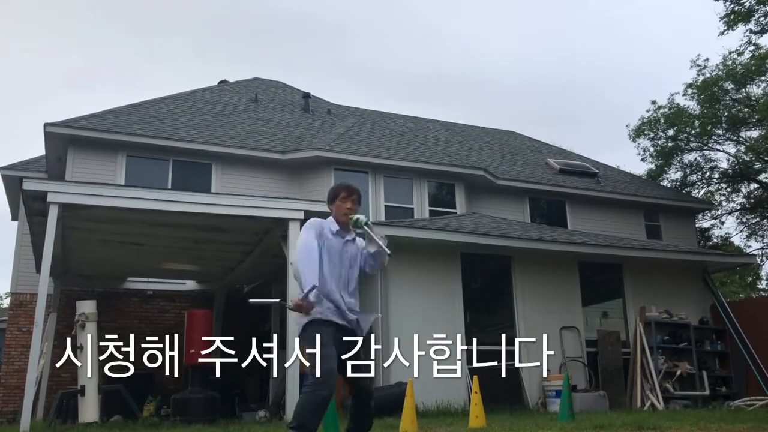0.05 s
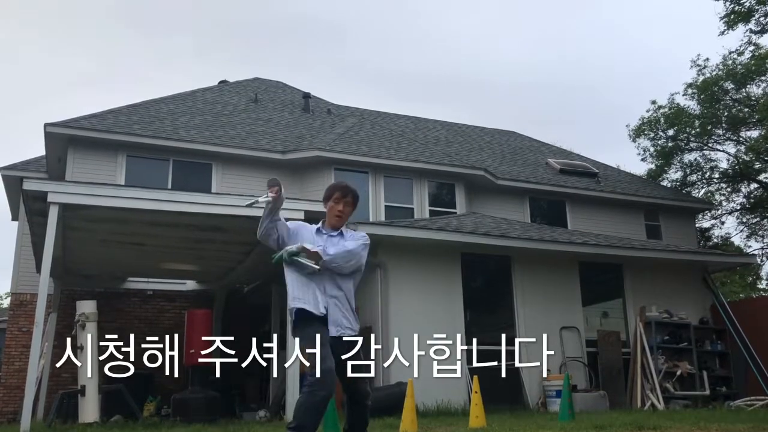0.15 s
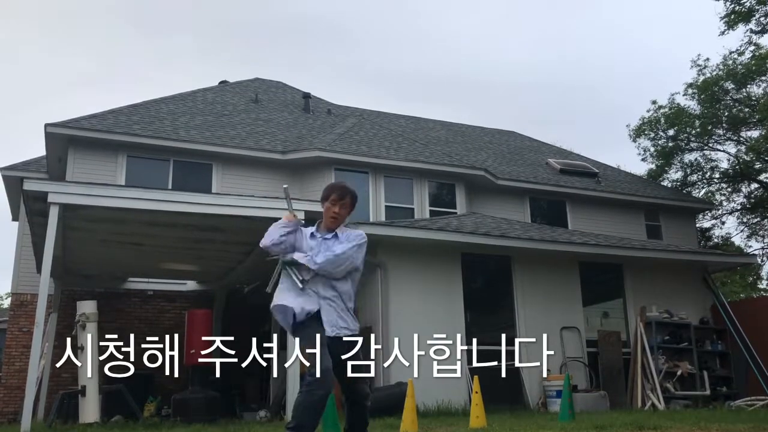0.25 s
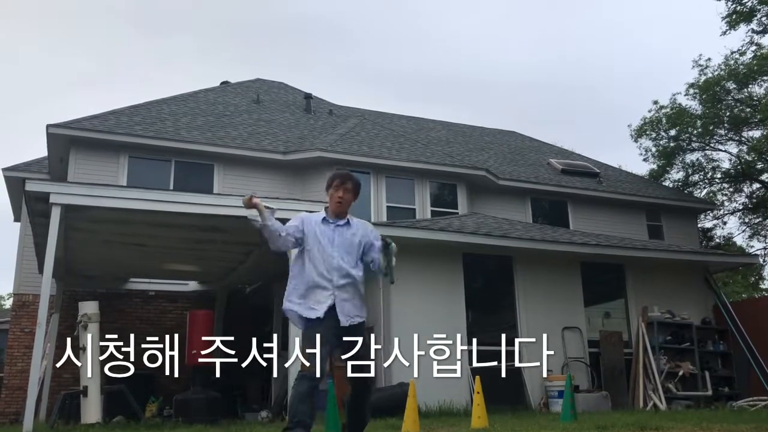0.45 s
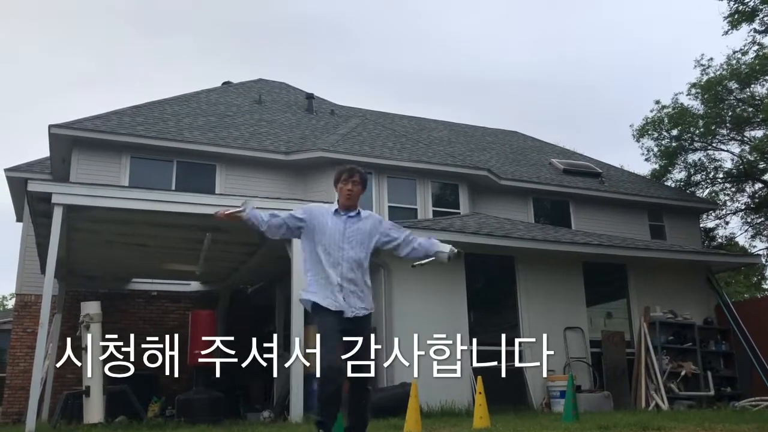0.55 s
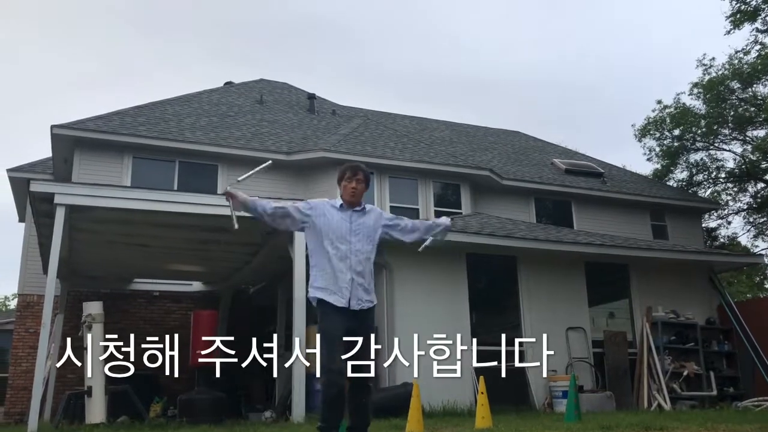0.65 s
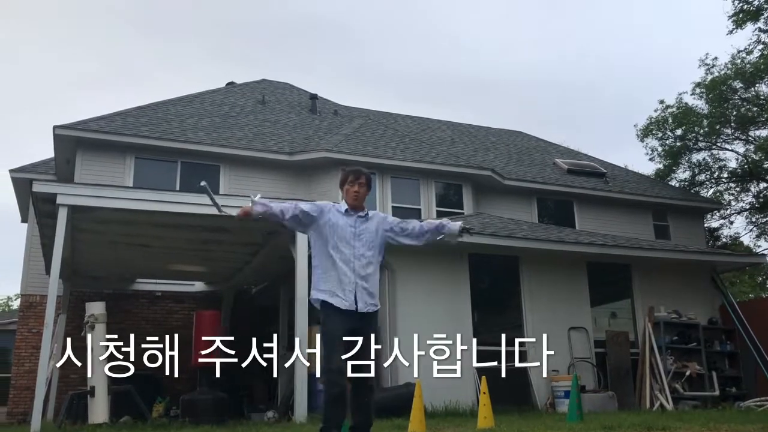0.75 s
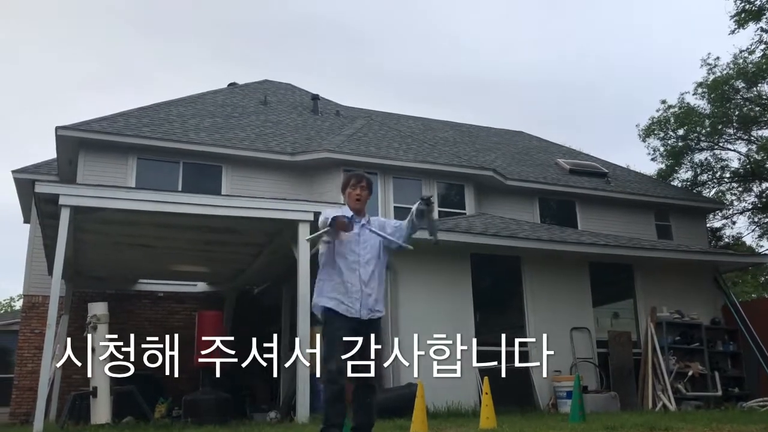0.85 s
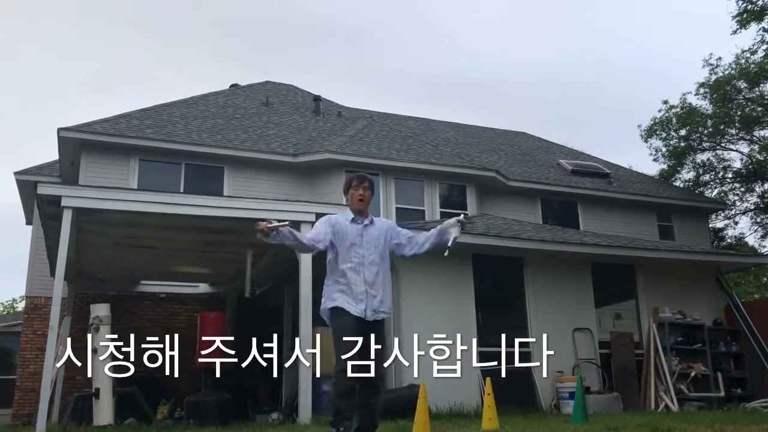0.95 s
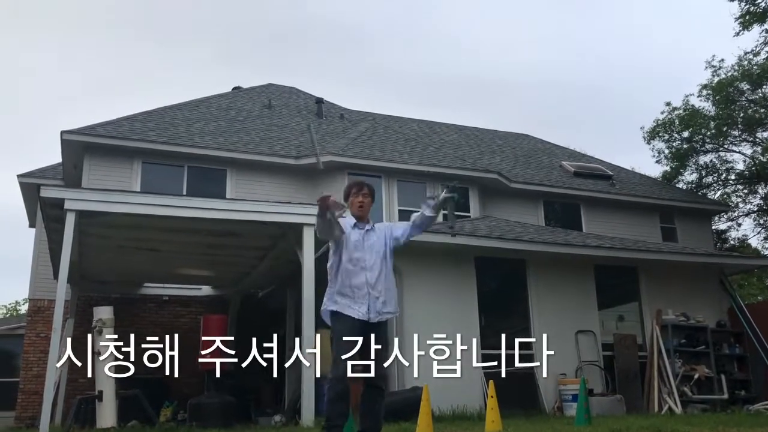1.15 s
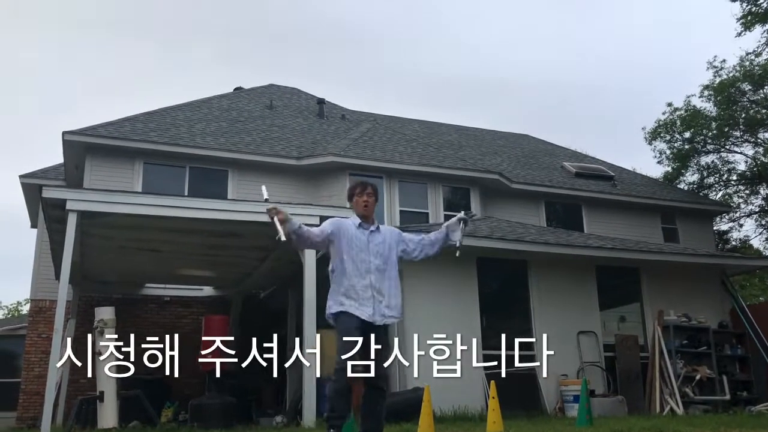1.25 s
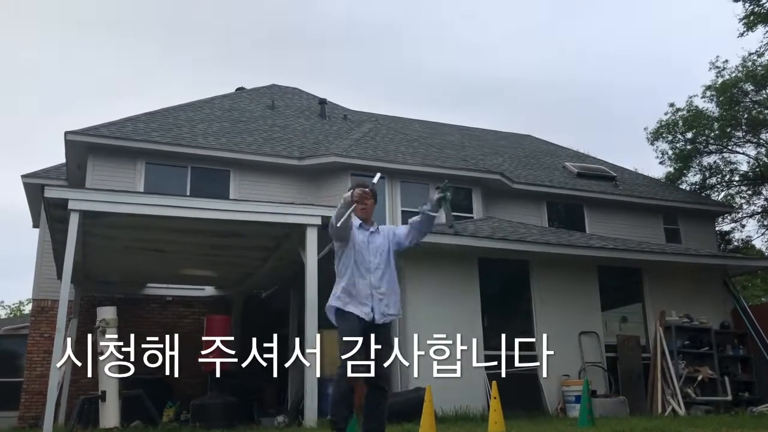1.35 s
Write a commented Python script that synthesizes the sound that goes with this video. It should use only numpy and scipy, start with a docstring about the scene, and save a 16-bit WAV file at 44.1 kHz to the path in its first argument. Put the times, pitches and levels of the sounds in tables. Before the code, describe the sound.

Nunchucks swing outdoors a few metres away, their chains clinking and jingling in quick, uneven bursts with a soft rustle of sleeves. At about 0.2 seconds the sticks hit together in one sharp clack, by far the loudest sound. Much lighter taps follow near 0.5, 0.8 and 1.1 seconds. The clinking continues until about 1.4 seconds, with slight reflections from the house and a faint low rumble underneath.

```python
"""Nunchucks in a backyard

Two pairs of nunchucks swing a few metres from a house. Impacts, one very hard, excite the
sticks' damped modes; the chains chatter, clink and jingle over the friction noise of the swing.
The house and porch reflect the sound; under it lie a low outdoor rumble and a faint hum."""
import sys
import numpy as np
from scipy import signal
from scipy.fft import rfft, irfft
from scipy.io import wavfile

SR = 44100
rng = np.random.default_rng(int(sys.argv[2]) if len(sys.argv) > 2 else 0)


def wav_record(signal):
    """Record a signal, one row per channel, as 16-bit PCM in the file named by sys.argv[1]."""
    frames = np.transpose(np.atleast_2d(signal))
    bounded = np.clip(frames, -1, 1)
    # unit amplitude maps onto the largest positive 16-bit level
    quanta = np.round(bounded * 32767).astype(np.int16)
    wavfile.write(sys.argv[1], SR, quanta)


N = 61739

# stick striking stick: start_s, level_db, pitch_hz
STICK_KNOCKS = [(0.2364, -1.5, 3013), (.393, -33, 2920), (.456, -23.5, 3014), (.462, -31.5, 2975),
                (0.673, -38, 3030), (.697, -33, 2976), (0.806, -28.5, 3004), (0.8129, -20.5, 3065),
                (1.0641, -30.5, 2857)]
# modes of a stick pitched at STICK_HZ: frequency_hz, level_db, t60_s
STICK_MODES = [(750, -31.5, 0.014), (1267, -26.5, 0.011), (2410, -43, 0.0028), (3028, 1, 0.01),
               (4020, -18, 0.025), (7860, -11.5, 0.0089), (8730, -16, 0.016), (10200, -18.5, 0.011),
               (11970, -10, .005), (14400, -9, .009), (15750, -11, .009)]
# spectrum of the contact noise: frequency_hz, relative_db
CRACK_SPECTRUM = [(1600, -9.5), (3900, -3.5), (5400, -8.5), (8000, 7.5)]
STICK_HZ, CONTACT_S, CRACK_DB, CRACK_DECAY_S = 3010, 0.00066, -14.5, 0.0026
LIGHT_KNOCK_DB, FREE_RING_DB, FREE_RING_T60_S, DAMPING_DB_PER_DB = -36, -7, 0.063, 0.54
def knock(level_db, pitch_hz):
    """Impact excites damped modes. A lightly touched stick rings on; a hard blow damps that ring."""
    t = np.arange(4096) / SR
    modes = sum(amp(db - 60 * t / t60) * np.sin(2 * np.pi * hz * pitch_hz / STICK_HZ * t)
                for hz, db, t60 in STICK_MODES)
    free_db = FREE_RING_DB - DAMPING_DB_PER_DB * (level_db - LIGHT_KNOCK_DB)
    free_ring = amp(free_db - 60 * t / FREE_RING_T60_S) * np.sin(2 * np.pi * pitch_hz * t)
    noise = colour(rng.standard_normal(len(t)), CRACK_SPECTRUM)
    crack = amp(CRACK_DB) * noise * np.exp(-t / CRACK_DECAY_S)
    onset = np.sin(np.pi / 2 * np.minimum(t / CONTACT_S, 1)) ** 2
    return amp(level_db) * (modes + free_ring + crack) * onset


# a chain skipping along a stick: start_s, level_db
CHAIN_CHATTERS = [(0.099, -33), (0.27, -38.5), (.281, -39), (0.296, -44), (0.3483, -35.5), (.372, -40),
                  (0.41, -33), (0.703, -40.5), (0.723, -41), (1.018, -36.5), (1.0424, -43), (1.055, -44),
                  (1.074, -39.5), (1.165, -41), (1.1755, -40), (1.2664, -37), (1.278, -46)]
TOUCH_GAP_S, TOUCH_STEP_DB, TOUCH_DETUNE, TOUCH_T60_S = 0.0028, -2.5, 0.071, 0.022
def chatter(level_db):
    """Repeated contact: four ever softer touches ring the stick, each at a slightly different pitch."""
    t = np.arange(2048) / SR
    out = np.zeros(len(t))
    envelope = np.minimum(t / CONTACT_S, 1) * amp(level_db - 60 * t / TOUCH_T60_S)
    for k, (late, detune) in enumerate(rng.uniform(-1, 1, size=(4, 2))):
        ring = np.sin(2 * np.pi * STICK_HZ * (1 + TOUCH_DETUNE * detune) * t)
        add(out, TOUCH_GAP_S * (k + late / 2), amp(TOUCH_STEP_DB * k) * envelope * ring)
    return out


# links snapping against each other: start_s, level_db, pitch_hz
CHAIN_CLINKS = [(.008, -31, 7100), (0.05, -33.5, 12400), (.144, -40.5, 13500), (0.1525, -35.5, 9400),
                (0.246, -28, 8800), (0.2537, -24, 15000), (0.266, -30, 11000), (0.3243, -30.5, 7940),
                (.337, -31.5, 7000), (0.364, -33.5, 10100), (0.391, -34.5, 9730), (.4485, -30, 11100),
                (.4566, -27.5, 9750), (.497, -30.5, 8900), (0.5122, -25.5, 8850), (0.52, -30.5, 8050),
                (.654, -42, 9200), (.674, -37.5, 7550), (.753, -38.5, 11000), (0.804, -33.5, 9530),
                (0.8143, -34.5, 7000), (.886, -39.5, 9300), (.952, -32.5, 13500), (0.993, -37.5, 11260),
                (1.012, -37.5, 9000), (1.0634, -24, 12800), (1.1378, -32.5, 8350), (1.164, -39.5, 5960),
                (1.178, -30, 8860), (1.186, -31, 8800), (1.325, -35, 9680), (1.3753, -36.5, 8740),
                (1.385, -31, 11100)]
# spectrum of the chain: frequency_hz, relative_db
CHAIN_SPECTRUM = [(300, -28), (1500, -5), (2800, -29), (4600, 5.5), (6500, 1), (8400, 9), (9700, 1.5),
                  (12500, 0), (15000, 2), (16500, -2)]
CLINK_RISE_S, CLINK_DECAY_S, CLINK_WIDTH_OCTAVES, CLINK_SKIRT_DB = 0.00047, 0.0027, 0.58, -16.5
LINK_RING_DB = -8.5
def clink(level_db, pitch_hz):
    """A brief collision has a broad spectrum: links snap in a band of noise around one link's ring."""
    t = np.arange(0, 0.03, 1 / SR)
    hz = np.geomspace(300, 17000, 40)
    band = np.exp(-0.5 * (np.log2(hz / pitch_hz) / CLINK_WIDTH_OCTAVES) ** 2)
    spectrum_db = read(CHAIN_SPECTRUM, hz) + 20 * np.log10(band + amp(CLINK_SKIRT_DB))
    envelope = np.minimum(t / CLINK_RISE_S, 1) * np.exp(-t / CLINK_DECAY_S)
    snap = colour(rng.standard_normal(len(t)), np.c_[hz, spectrum_db]) * envelope
    return amp(level_db) * (snap + amp(LINK_RING_DB) * link_ring(pitch_hz, decay_s=0.0021))


def link_ring(pitch_hz, decay_s):
    """A struck link is a damped oscillator: one pitch with an exponential decay."""
    t = np.arange(0, 0.03, 1 / SR)
    return np.sin(2 * np.pi * pitch_hz * t) * np.minimum(t / CLINK_RISE_S, 1) * np.exp(-t / decay_s)


# loudness of sleeves and chains as they swing: time_s, level_db
SWING_LEVEL = [(0, -44.5), (0.038, -56.5), (0.05, -40), (.11, -51.5), (.2, -56.5), (.232, -49), (.25, -43),
               (.305, -65), (.34, -49), (.39, -46.5), (.44, -53.5), (.48, -43), (.52, -45.5), (0.559, -52),
               (.63, -79), (0.719, -52.5), (.79, -57), (.825, -49), (.87, -57.5), (.95, -49.5), (.99, -61),
               (1.049, -47), (1.12, -56), (1.18, -47), (1.23, -71), (1.275, -44.5), (1.315, -58),
               (1.4, -52.5)]
# spectrum of the rustle: frequency_hz, relative_db
RUSTLE_SPECTRUM = [(200, -10), (700, 3.5), (1400, 2), (1900, -2.5), (2500, 7), (3000, 8.5), (3600, 4),
                   (4700, -3), (6500, -7), (8300, 2), (10000, -9.5), (16000, -7)]
GRAINS_PER_S, GRAIN_SPREAD_DB, FRICTION_SHARE = 1500, 8, 0.4
def rustle():
    """Friction noise: tiny random impulses and the smooth rub of cloth follow the swing."""
    sizes = amp(GRAIN_SPREAD_DB * np.minimum(rng.exponential(1, N), 2))
    grains = sizes * rng.choice([-1, 1], N) * (rng.random(N) < GRAINS_PER_S / SR)
    friction = FRICTION_SHARE * rng.standard_normal(N)
    level_db = np.interp(np.arange(N) / SR, *np.transpose(SWING_LEVEL))
    return amp(level_db) * colour(unit(grains) + friction, RUSTLE_SPECTRUM)


JINGLES_PER_S, JINGLE_DB, JINGLE_SPREAD_DB, JINGLE_LOW_HZ, JINGLE_HIGH_HZ = 210, 16, 2.5, 5400, 12350
def jingle():
    """Random collisions: loose links give heavily damped ticks, louder as the swing quickens."""
    out = np.zeros(N)
    for when, height, softness in rng.random((round(JINGLES_PER_S * N / SR), 3)):
        start_s = when * N / SR
        swing_db = np.interp(start_s, *np.transpose(SWING_LEVEL))
        level_db = swing_db + JINGLE_DB - JINGLE_SPREAD_DB * np.log(max(softness, 0.1))
        pitch_hz = JINGLE_LOW_HZ * (JINGLE_HIGH_HZ / JINGLE_LOW_HZ) ** height
        add(out, start_s, amp(level_db) * link_ring(pitch_hz, decay_s=0.0003))
    return out


# reflections off the house and porch: delay_s, gain_db
HOUSE_ECHOES = [(0.0121, -23), (.023, -24.5)]
# spectrum of the diffuse tail: frequency_hz, level_db
TAIL_SPECTRUM = [(300, -16.5), (1500, -6), (3000, -15.5), (5000, -5.5), (15000, -11)]
# reverberation time: frequency_hz, t60_s
TAIL_DECAY = [(3000, 0.29), (9000, 0.28)]
TAIL_RISE_S = 0.0025
def yard(sound):
    """Reflection as convolution: the yard's impulse response is two echoes and a short diffuse tail."""
    hz, t, noise = signal.stft(rng.standard_normal(SR // 2), SR, nperseg=256)
    fade = amp(-60 * t / read(TAIL_DECAY, hz)[:, None]) * np.minimum(t / TAIL_RISE_S, 1)
    band_energy = (fade ** 2).mean(1, keepdims=True) * SR / 2
    fade *= amp(read(TAIL_SPECTRUM, hz))[:, None] / np.sqrt(band_energy)
    response = signal.istft(noise * fade, SR, nperseg=256)[1]
    for delay_s, gain_db in HOUSE_ECHOES:
        add(response, delay_s, amp([gain_db]))
    return signal.fftconvolve(sound, response)[:N]


# spectrum of the outdoor rumble: frequency_hz, relative_db
RUMBLE_SPECTRUM = [(42, -53), (78, -9), (100, -12), (132, 2.5), (190, -2), (255, 4), (305, -5.5), (355, -3),
                   (430, -9.5), (650, -17.5), (1000, -22.5), (2900, -22.5), (4000, -33), (8000, -44.5)]
# swells of a faint hum: start_s, length_s, pitch_hz, level_db
HUM_SWELLS = [(.44, 0.277, 173, -34), (.84, 0.247, 148.2, -41.5)]
RUMBLE_DB, HUM_RISE_S, HUM_SAG_DB_PER_S, HUM_RELEASE_S = -43.5, 0.07, 29, 0.036
def background():
    """Stationary noise from light wind and far traffic, with two swells of a low pure tone."""
    out = amp(RUMBLE_DB) * colour(rng.standard_normal(N), RUMBLE_SPECTRUM)
    for start_s, length_s, pitch_hz, level_db in HUM_SWELLS:
        t = np.arange(0, length_s, 1 / SR)
        swell = np.minimum(t / HUM_RISE_S, 1) * np.minimum((length_s - t) / HUM_RELEASE_S, 1)
        tone = np.sin(2 * np.pi * (pitch_hz * t + rng.random()))
        add(out, start_s, swell * amp(level_db - HUM_SAG_DB_PER_S * t) * tone)
    return out


def amp(db):
    """Decibels to amplitude ratio."""
    return 10 ** (np.asarray(db) / 20)


def unit(x):
    """Normalisation to rms 1."""
    return x / np.sqrt(np.mean(x ** 2) + 1e-20)


def read(curve, hz):
    """Interpolation on a log-frequency axis."""
    curve_hz, values = np.transpose(curve)
    return np.interp(np.log(hz + 1), np.log(curve_hz + 1), values)


def add(mix, start_s, sound):
    """Superposition of a sound on the mix, from start_s on."""
    part = mix[max(round(start_s * SR), 0):][:len(sound)]
    part += sound[:len(part)]


def colour(x, spectrum):
    """Filtering in the frequency domain; the result has rms 1."""
    gain = amp(read(spectrum, np.fft.rfftfreq(len(x), 1 / SR)))
    return unit(irfft(rfft(x) * gain, len(x)))


BOUNCE_S, BOUNCE_DB = 0.0068, -6
def scene():
    """Superposition of direct sound, reflections and background; each clink rebounds once."""
    ambience = background()
    direct = rustle()
    for start_s, level_db, pitch_hz in STICK_KNOCKS:
        add(direct, start_s, knock(level_db, pitch_hz))
    for start_s, level_db in CHAIN_CHATTERS:
        add(direct, start_s, chatter(level_db))
    for start_s, level_db, pitch_hz in CHAIN_CLINKS:
        add(direct, start_s, clink(level_db, pitch_hz))
        rebound_s = start_s + BOUNCE_S * (0.5 + rng.random())
        add(direct, rebound_s, clink(level_db + BOUNCE_DB, pitch_hz))
    direct += jingle()
    return (direct + yard(direct) + ambience)[None]


BAND_LIMIT_HZ = 15950
def record(dry):
    """Band limiting: a linear-phase low-pass filter removes the highest treble."""
    lowpass = signal.firwin(255, BAND_LIMIT_HZ, window=("kaiser", 8), fs=SR)
    return signal.oaconvolve(dry, lowpass[None], "same")


dry = scene()
out = record(dry)
wav_record(out)
```